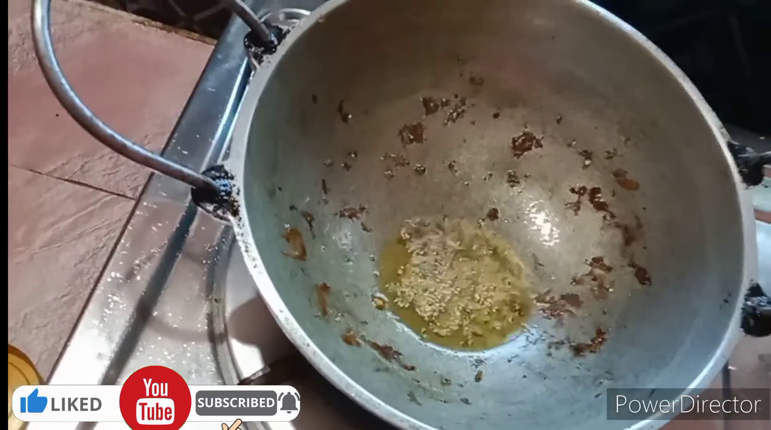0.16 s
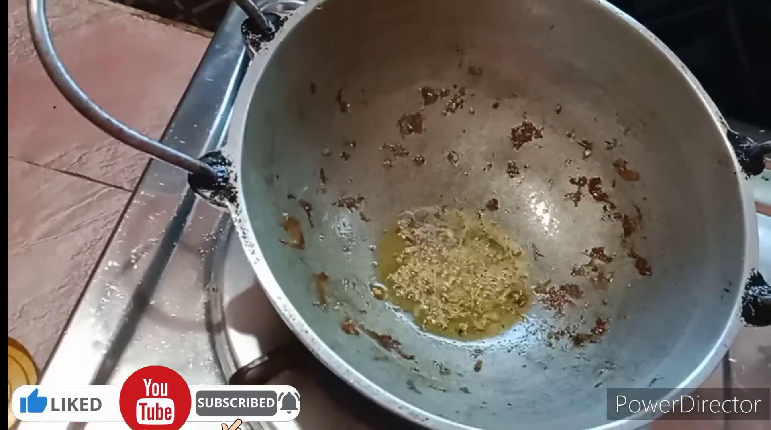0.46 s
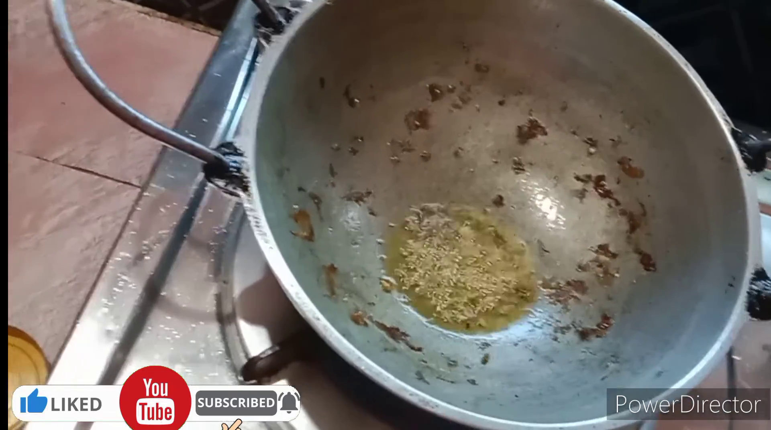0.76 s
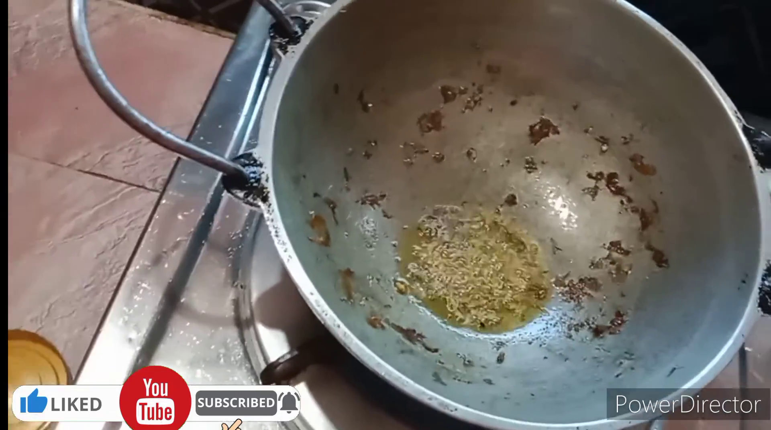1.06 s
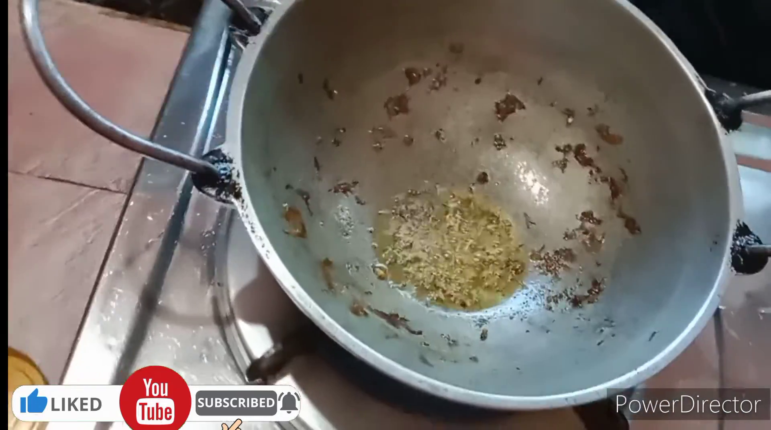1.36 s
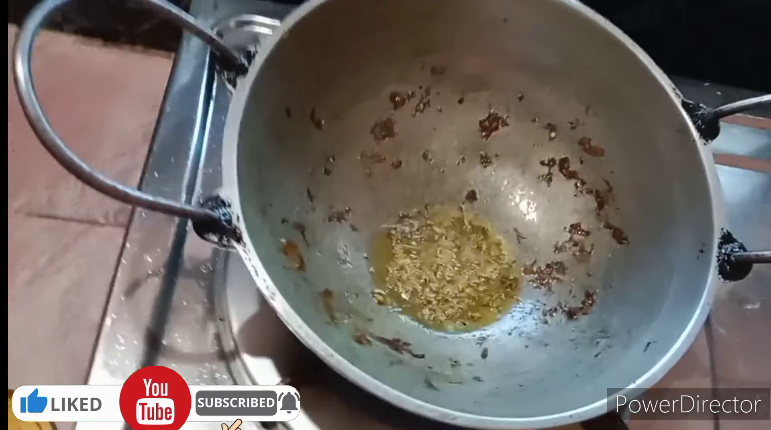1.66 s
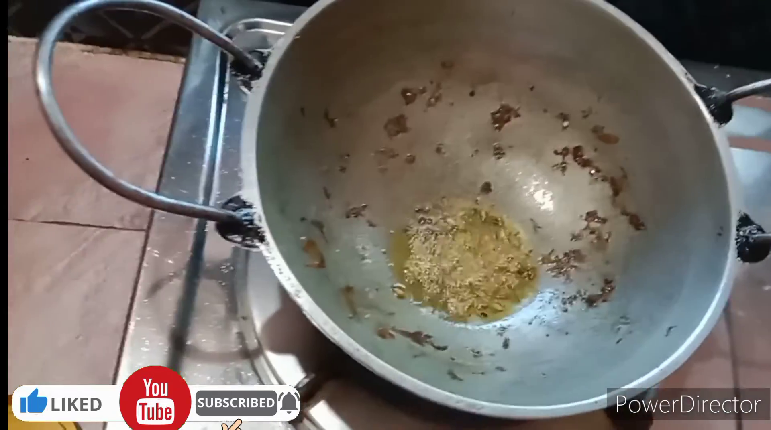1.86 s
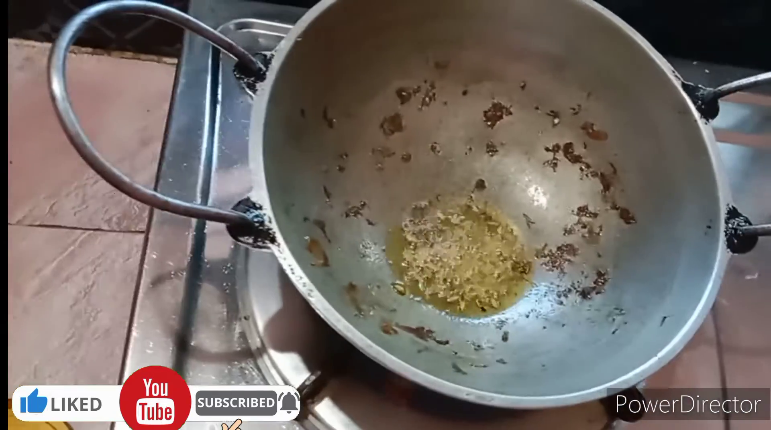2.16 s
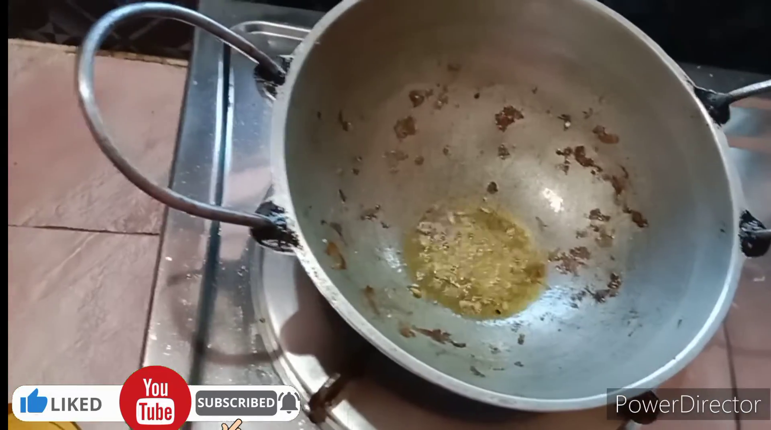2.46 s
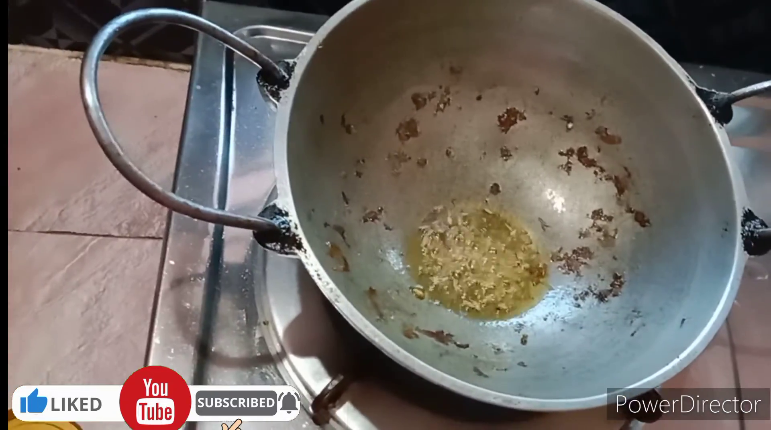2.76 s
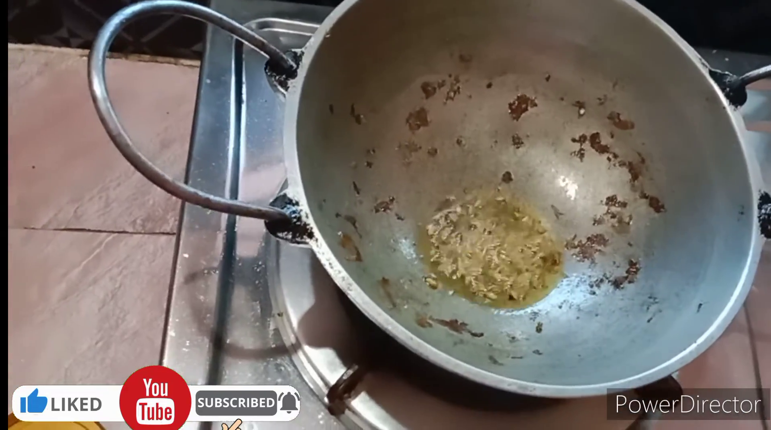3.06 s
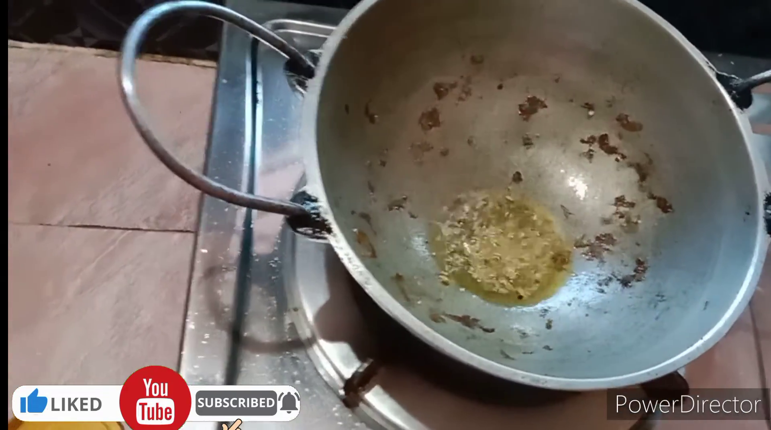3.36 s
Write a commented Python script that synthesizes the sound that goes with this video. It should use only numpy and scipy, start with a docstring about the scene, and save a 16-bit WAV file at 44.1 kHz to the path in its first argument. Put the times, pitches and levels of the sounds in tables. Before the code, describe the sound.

Small seeds pop in hot oil in a round metal pan, irregularly at first, then more densely, over thin fizz; a hollow knock comes near the end. Close microphone, tiled home kitchen.

```python
"""Small seeds burst with sharp pops in hot oil in a round metal pan; each pop is a click with a spatter and a short ring.
The bowl of the pan and the tiled kitchen answer each pop. Around them lies a dense fizz, made of thousands of tiny clicks.
Something hollow is knocked near the end (decaying tones), and a puff hits the microphone (one filtered jolt).
Behind it are a rumble, a hum and faint low swells. The recorder's noise suppressor holds steady sound down
and lets it through just after each sound that rises well above it."""
import sys
import numpy as np
from scipy import signal
from scipy.fft import rfft, irfft
from scipy.io import wavfile
from scipy.ndimage import uniform_filter1d, minimum_filter1d

SR = 44100
rng = np.random.default_rng(int(sys.argv[2]) if len(sys.argv) > 2 else 0)


def master(y):
    """Save y as 16-bit WAV."""
    cut = np.clip(np.atleast_2d(y).T, -1, 1)
    pcm = np.round(cut * 32767)  # scale
    wavfile.write(sys.argv[1], SR, pcm.astype(np.int16))


N = 154350   # length in samples: 3.5 s


def amp(db):
    """Turn decibels into a plain multiplier."""
    return 10 ** (np.asarray(db) / 20)


def rms_one(x):
    """Scale a sound to an average strength (rms) of 1."""
    return x / np.sqrt(np.mean(x ** 2) + 1e-20)


def peak_one(x):
    """Scale a sound so that its highest peak is 1."""
    return x / np.abs(x).max()


def at_hz(points, hz):
    """Read a (pitch, value) table at any pitch, with straight lines over log pitch."""
    pitches, values = np.transpose(points)
    return np.interp(np.log(np.maximum(hz, 1)), np.log(pitches), values)


def drift(rate_hz):
    """Slow random wandering with spread 1: smoothed noise, made at 1/40 of the sample rate."""
    r = np.exp(-2 * np.pi * rate_hz * 40 / SR)
    noise = rng.standard_normal(N // 40 + 2002)
    slow = signal.lfilter([1], [1, -2 * r, r * r], noise)[2000:]   # skip the filter's start
    return np.interp(np.arange(N) / 40, np.arange(len(slow)), rms_one(slow))


def ring(x, hz, t60_s):
    """A resonance: a unit click sets off a sine of height 1 that falls 60 dB in t60_s."""
    r = amp(-60 / (t60_s * SR))
    w = 2 * np.pi * hz / SR
    return signal.lfilter([0, np.sin(w)], [1, -2 * r * np.cos(w), r * r], x + 1e-18)


def band(x, low_hz, high_hz, order=2):
    """Keep only the sound between two pitches."""
    return signal.sosfilt(signal.butter(order, [low_hz, high_hz], "band", fs=SR, output="sos"), x)


def coloured(tracks, spectrum, patchy_db):
    """Shape two noise tracks in 21 narrow bands, each with its own level and flicker; rms 1."""
    edges = np.geomspace(spectrum[0][0], spectrum[-1][0], 22)
    together = drift(8)   # flicker that all bands share
    out = np.zeros(N)
    for k, (low, high) in enumerate(zip(edges, edges[1:])):
        flicker_db = patchy_db * (0.26 * together + drift(11))
        level_db = at_hz(spectrum, np.sqrt(low * high)) + flicker_db
        out += amp(level_db) * band(tracks[k % 2], low, high, order=3)
    return rms_one(out)


def pops():
    """Each seed bursts as a click with spatter, rings at its own pitch and bounces in the bowl; four tracks."""
    # Bursting seeds: start_s, level_db (the 5.87-8.75 kHz part), ring_pitch_hz,
    # then levels over that part: lows_db (under 2 kHz), mids_db (2-5 kHz), highs_db (over 10 kHz)
    seeds = [(0.0335, -38, 7100, -31, -3, -3), (0.09, -38, 8500, -31, -5, -4),
             (0.173, -47, 7000, -33, 0, -12.5), (0.1849, -26.5, 8400, -24, -7, -8),
             (0.3866, -12.5, 8400, -15.5, -7.5, -3.5), (0.676, -33, 9000, -23, -9, -19),
             (0.7436, -10, 4750, -18, -12, -6), (0.809, -28.5, 8400, -17, -2, -7),
             (0.897, -47, 5240, -35, 6.5, -5), (0.9989, -22.5, 7800, -16.5, -8.5, 0),
             (1.2366, -24.5, 9150, -38, -10.5, -9), (1.3936, -19.5, 7900, -33, -10, -9),
             (1.4505, -18.5, 7200, -20, -8, -12.5), (1.5021, -19, 8420, -9.5, 0.5, 3.5),
             (1.5671, -20, 8000, -16, -5, -5.5), (1.595, -17, 7600, -22.5, -10, -5.5),
             (1.637, -26, 7500, -39, -17, -8), (1.6452, -23, 4960, -31, -15.5, -18),
             (1.7309, -34.5, 2500, -5.5, 13.5, 5), (1.7585, -18, 7680, -18.5, -7.5, -4),
             (1.8275, -17.5, 8740, -23.5, -5.5, -8), (1.9791, -30.5, 4150, -21.5, -2, -11),
             (1.9911, -14.5, 4200, -45, -12.5, -4), (2.0034, -21, 3930, -26.5, -3.5, -30),
             (2.0369, -12, 4540, -20, -0.5, -1.5), (2.0728, -9, 3800, -26.5, -10, -23),
             (2.1248, -19.5, 5000, -40, -9, -4), (2.2182, -33, 3530, -31, 0, -6),
             (2.2692, -23.5, 8330, -22, -4, -0.5), (2.3014, -35.5, 3590, -29, -3, -16),
             (2.3749, -49, 3880, -37.5, 6.5, -19), (2.5047, -28, 7660, -18.5, -4.5, -1.5),
             (2.575, -29.5, 7930, -48.5, -20, -20), (2.6, -22.5, 7500, -32.5, -6.5, -3.5),
             (2.6432, -20, 6870, -32, -9.5, -12), (2.7753, -16.5, 8300, -16.5, -7, 1),
             (2.8554, -16, 7200, -14, -2.5, -2.5), (2.915, -20.5, 7880, -43.5, -10, -25),
             (2.9893, -29, 8800, -42, -11, -4), (3.0023, -33.5, 3730, -13.5, 7, -10),
             (3.036, -27, 7850, -19.5, -9.5, -1), (3.1068, -32.5, 8460, -25, -5.5, -1),
             (3.141, -11.5, 7400, -16, -5.5, -6), (3.1654, -6, 6700, -22, -24, -1),
             (3.175, -6, 7600, -18, -6, -19), (3.2628, -7.5, 7800, -13.5, -8.5, -5),
             (3.29, -11.5, 4160, -16, -10, -30), (3.3138, -18, 8160, -11.5, -4, -3)]
    # Bounces off the bowl: delay_s (before stretching by place), level_db
    bowl_echoes = [(.0018, -8), (.0026, -15.5)]
    onset_s = -.0004   # shifts every start
    spatter_t60_s, spatter_db = 0.0045, -13.5
    ring_db, ring_cycles = -4.5, 11   # ring level over the burst; cycles to fall 60 dB

    t = np.arange(1024) / SR
    out = np.zeros((4, N + SR))
    bursts = amp(spatter_db - 60 * t / spatter_t60_s) * rng.standard_normal((len(seeds), len(t)))
    bursts[:, 0] = -1   # the click
    places = rng.uniform(.85, 1.4, len(seeds))   # where in the bowl: stretches the echo delays
    for k, (start_s, level_db, ring_hz, lows_db, mids_db, highs_db) in enumerate(seeds):
        burst = bursts[k]
        pop = peak_one(band(burst, 5870, 8750))
        pop += amp(lows_db) * peak_one(band(burst, 718, 1978, order=3))
        pop += amp(mids_db) * peak_one(band(burst, 2385, 5070, order=3))
        pop += amp(highs_db) * peak_one(band(burst, 10320, 18600))
        ringing = peak_one(ring(band(burst, 1400, 14200), ring_hz, ring_cycles / ring_hz))
        pop = pop + amp(ring_db) * np.abs(pop).max() * ringing
        bounced = band(pop, 2500, 12000, order=1)   # echoes are mostly treble

        i = int((start_s + onset_s) * SR)
        out[k % 4, i:i + len(t)] += amp(level_db) * pop
        for delay_s, echo_db in bowl_echoes:
            i = int((start_s + onset_s + delay_s * places[k]) * SR)
            out[k % 4, i:i + len(t)] += amp(level_db + echo_db) * bounced
    return out[:, :N]


def fizz():
    """Thousands of tiny steam bubbles a second, each a click of random sign and strength."""
    # Tone of the fizz: pitch_hz, relative level_db (per Hz)
    fizz_tone = [(500, -33.5), (900, -27), (1600, -28.5), (2400, -26.5), (3100, -28.5), (3600, -12),
                 (5000, -12), (6900, -10.5), (8700, -9.5), (9600, -15), (11500, -21.5), (13000, -18),
                 (14000, -23.5), (16500, -17.5)]
    # Loudness of the fizz over time: time_s, level_db
    fizz_loudness = [(0, -49), (.15, -47), (.3, -47.5), (.6, -50.5), (.93, -47.5), (1.15, -48),
                     (1.35, -47.5), (1.9, -45), (2.199, -47), (2.45, -47.5), (2.75, -46), (3.1, -45),
                     (3.5, -48)]
    bubbles_per_s, spread_db, patchy_db = 9000, 4.5, 2

    happens = rng.random((2, N)) < bubbles_per_s / SR
    signs = rng.choice([-1, 1], (2, N))
    strengths = amp(spread_db * np.minimum(rng.exponential(1, (2, N)), 5))
    bubbles = happens * signs * strengths
    loudness_db = np.interp(np.arange(N) / SR, *np.transpose(fizz_loudness))
    return amp(loudness_db) * coloured(bubbles, fizz_tone, patchy_db)


def knocks():
    """A soft blow and its bounce set a hollow thing ringing; a short rattle after each keeps it stirring."""
    # Blows: start_s, level_db (force)
    blows = [(3.131, -33), (3.146, -39.5)]
    # Tones of the hollow thing: pitch_hz, level_db (over the force), t60_s (time to fall 60 dB)
    hollow_tones = [(195.9, -3, 0.45), (216.6, -7, 0.55), (280.5, -7.5, 0.6), (293, -3, 1),
                    (320, -11, 0.31), (390, -13, 0.37), (490, -12, 0.36), (564.6, -8.5, 0.26),
                    (669, -6, 0.17), (707, -10, 0.2), (736, -12, 0.2), (833, -11, 0.4), (866, -12, 0.35),
                    (966, -13, 0.24), (1137, -11, 0.1), (1560, -12, 0.09), (1880, -9, 0.07)]
    softness_hz = 2160   # the blow loses its treble above this
    rattle_db, rattle_t60_s = -31.5, 0.14
    thud_db = 17   # the unpitched part of the blow, over its force
    damped_s, damped_db_per_s = 3.325, 899   # when and how fast the ringing is stilled

    t = np.arange(N) / SR
    force = np.zeros(N)
    white = rng.standard_normal(N)
    for start_s, level_db in blows:
        force[int(start_s * SR)] += amp(level_db)
        fall_db = 60 * np.maximum(t - start_s, 0) / rattle_t60_s
        force += amp(level_db + rattle_db - fall_db) * (t > start_s) * white
    r = np.exp(-2 * np.pi * softness_hz / SR)
    force = signal.lfilter([(1 - r) ** 2], [1, -2 * r, r * r], force + 1e-18)

    knocked = amp(thud_db) * force
    for k, (hz, level_db, t60_s) in enumerate(hollow_tones):
        knocked += (-1) ** k * amp(level_db) * ring(force, hz, t60_s)   # signs alternate
    damping = amp(-damped_db_per_s * np.maximum(t - damped_s, 0))
    return damping * band(knocked, 140, 4000)


def puff():
    """A pressure jolt on the microphone port, which swings back through its low-cut."""
    start_s, rise_s, fall_s = 1.502, .0001, .0009
    level_db = -10   # before the rise, fall and low-cut shape it
    port_hz, port_damping = 76.6, 0.52

    t = np.maximum(np.arange(N) / SR - start_s, 0)
    jolt = amp(level_db) * (1 - np.exp(-t / rise_s)) * np.exp(-t / fall_s)
    w = 2 * np.pi * port_hz
    low_cut = signal.bilinear([1, 0, 0], [1, 2 * port_damping * w, w * w], SR)
    return signal.lfilter(*low_cut, jolt + 1e-18)


def kitchen(x):
    """Tiled walls: a dense tail swells in and dies band by band, with one distinct wall echo."""
    # How long the room rings: pitch_hz, t60_s (time to fall 60 dB)
    room_t60 = [(200, 0.53), (800, 0.38), (2000, 0.26), (6000, 0.28), (15000, 0.19)]
    tail_db, wall_echo_db = -5.5, -16
    first_s = 0.008   # the tail swells for this long; the wall echo comes 1 to 1.4 times as late

    t = np.arange(SR // 2) / SR
    white = rng.standard_normal(len(t))
    edges = np.geomspace(150, 16000, 10)
    tail = np.zeros(len(t))
    for low, high in zip(edges, edges[1:]):
        tail += band(white, low, high) * amp(-60 * t / at_hz(room_t60, np.sqrt(low * high)))
    tail *= np.clip(t / first_s, .55, 1) ** 2
    tail *= amp(tail_db) / np.sqrt(np.sum(tail ** 2))
    tail[int(first_s * rng.uniform(1, 1.4) * SR)] += amp(wall_echo_db)
    return signal.fftconvolve(x, tail)[:N]


def background():
    """Flame and room rumble (shaped noise), a wavering hum (sines) and faint low swells (bands of noise)."""
    # Tone of the flame and room: pitch_hz, relative level_db (per Hz)
    rumble_tone = [(25, -45), (60, -25.5), (120, -20), (200, -22), (350, -24.5), (500, -22.5), (600, -32),
                   (900, -40.5)]
    # Hum tones: pitch_hz, level_db (wavers around this)
    hum_tones = [(200, -72.5), (300, -85.5), (490, -75.5)]
    # Low swells: start_s, length_s, centre_hz, width_hz, level_db (at the top of the swell)
    low_swells = [(0.004, 0.13, 1087, 143, -67.5), (0.24, 0.093, 150, 102.4, -62.5),
                  (0.74, 0.068, 154, 91.5, -55.5), (0.902, 0.11, 280, 300, -61),
                  (0.91, 0.056, 730, 196, -62), (0.979, 0.048, 298, 306, -59), (1.6, 0.048, 90, 81, -66.5),
                  (2.769, 0.026, 296, 422, -49), (3.127, 0.19, 90, 119, -65.5)]

    t = np.arange(N) / SR
    out = amp(-67.5) * coloured(rng.standard_normal((2, N)), rumble_tone, patchy_db=0)
    for hz, level_db in hum_tones:
        wavering = amp(level_db + 4.2 * drift(3.6))
        out += wavering * np.sin(2 * np.pi * hz * t + 2.4 * drift(1.6))
    white = rng.standard_normal(N)
    for start_s, length_s, hz, width_hz, level_db in low_swells:
        rise_and_fall = np.sin(np.pi * np.clip((t - start_s) / length_s, 0, 1))
        noise = rms_one(band(white, hz - width_hz / 2, hz + width_hz / 2))
        out += amp(level_db) * rise_and_fall * noise
    return out


def scene():
    """Mix the close sounds with the softer-topped fizz, room answers and background."""
    near, knocked = pops(), knocks()
    steady = fizz() + background()
    steady += sum(kitchen(track) for track in near)
    steady += kitchen(amp(-18.5) * knocked)
    steady = signal.sosfilt(signal.cheby2(16, 40, 15600, fs=SR, output="sos"), steady)   # cut the top
    return (near.sum(axis=0) + steady + knocked + puff())[None]


def suppress(x):
    """In each band: find the steady level, open when the sound rises over it, hold, and close again."""
    # How far the closed suppressor turns the sound down: pitch_hz, depth_db
    closed_depth = [(100, 22.5), (600, 27), (1500, 16), (3000, 13), (8000, 11), (15000, 16.5)]
    open_over_db, open_slope = 3.5, 1.82   # rise needed to open, and how steeply it then opens
    hold_s, release_db_per_s, close_s = 0.02, 349.5, 0.0087
    shared_opening = 0.59   # how much the upper bands' average opening opens every band
    lead = 60   # samples by which it opens ahead of the sound

    spectrum, hz, t = rfft(x), np.fft.rfftfreq(N, 1 / SR), np.arange(N) / SR
    centres = np.geomspace(80, 14000, 16)
    r = np.exp(-1 / (close_s * SR))
    hold = int(hold_s * SR / 2) * 2 + 1
    parts, opens = [], []
    for k, centre in enumerate(centres):
        # overlapping bands that add up to the whole sound
        weight = np.interp(np.log(hz + 1), np.log(centres), np.arange(16) == k)
        part = irfft(spectrum * weight, N)
        power = uniform_filter1d(part ** 2, size=int(SR * (0.0023 + 1.5 / centre)))
        level_db = 10 * np.log10(np.maximum(power, 1e-14))
        # hold the highest recent level, then let it fall at the release speed
        level_db = -minimum_filter1d(-level_db, size=hold, origin=hold // 2)
        fall_db = release_db_per_s * t
        held_db = np.maximum.accumulate(level_db + fall_db) - fall_db
        steady_db = np.percentile(held_db, 15)
        rise_db = held_db - steady_db - open_over_db
        opening = np.clip(open_slope * rise_db / max(at_hz(closed_depth, centre), 1), 0, 1)
        opening = np.maximum(opening, signal.lfilter([1 - r], [1, -r], opening))   # close gently
        parts.append(part)
        opens.append(np.r_[opening[lead:], opening[-lead:]])

    together = shared_opening * np.mean(opens[8:], axis=0)
    out = np.zeros(N)
    for part, own, centre in zip(parts, opens, centres):
        out += part * amp(at_hz(closed_depth, centre) * (np.maximum(own, together) - 1))
    return out


def record(dry):
    """The recorder suppresses noise, then cuts the top above 16.8 kHz."""
    top_cut = signal.cheby2(12, 60, 16800, fs=SR, output="sos")
    return signal.sosfilt(top_cut, suppress(dry[0]))[None]


dry = scene()
out = record(dry)
master(out)
```